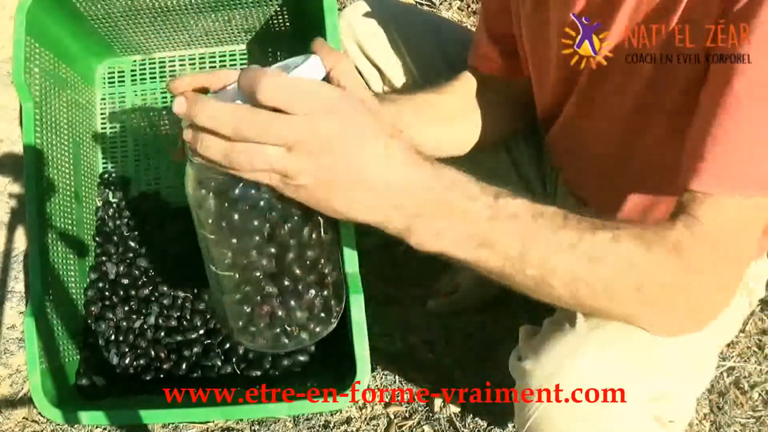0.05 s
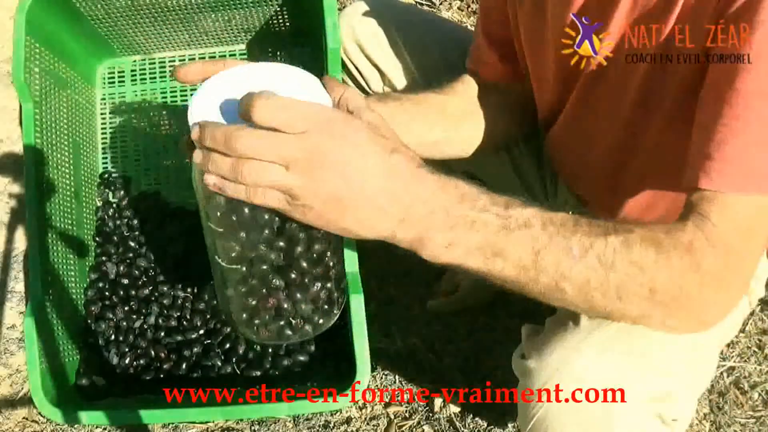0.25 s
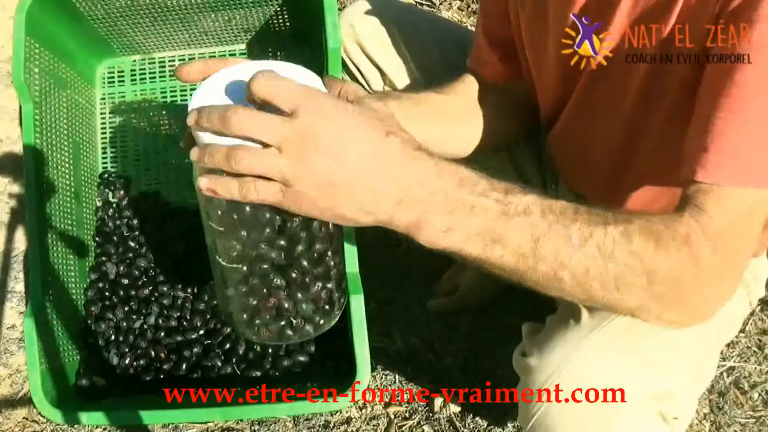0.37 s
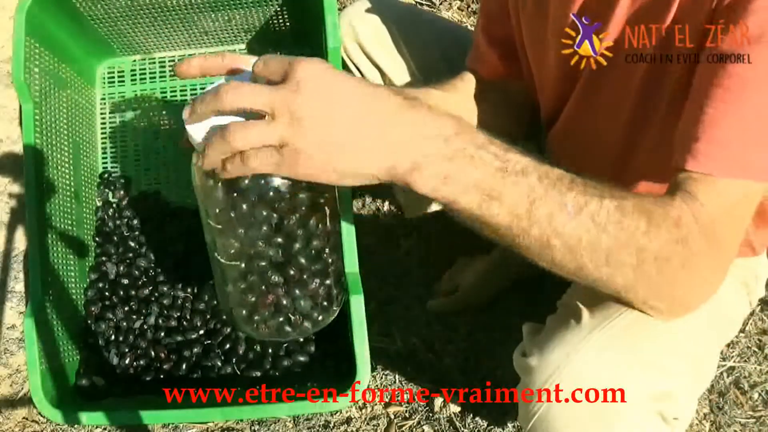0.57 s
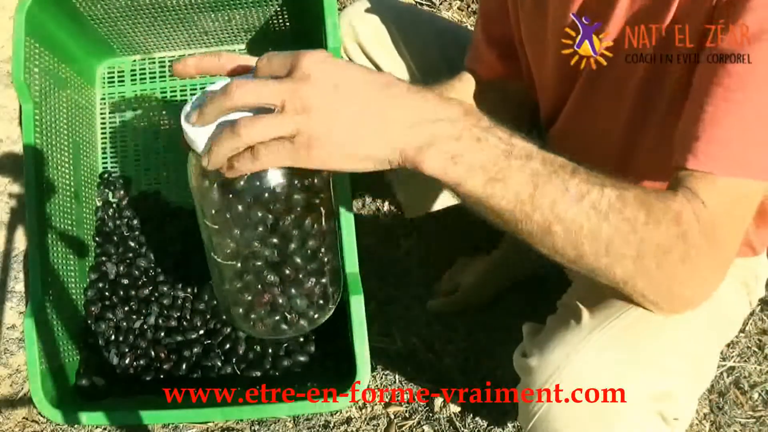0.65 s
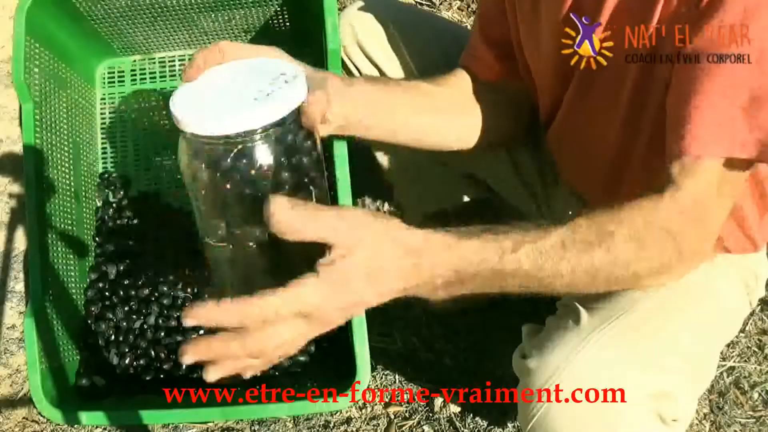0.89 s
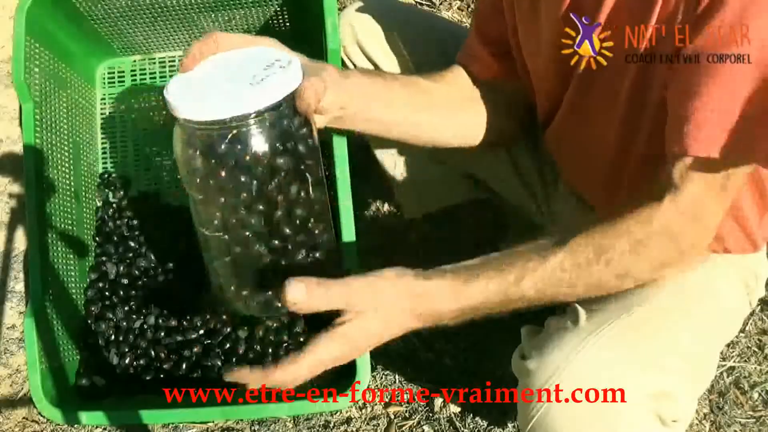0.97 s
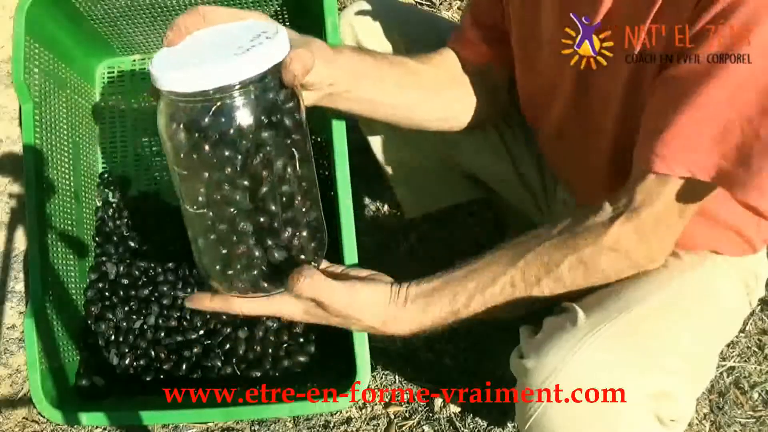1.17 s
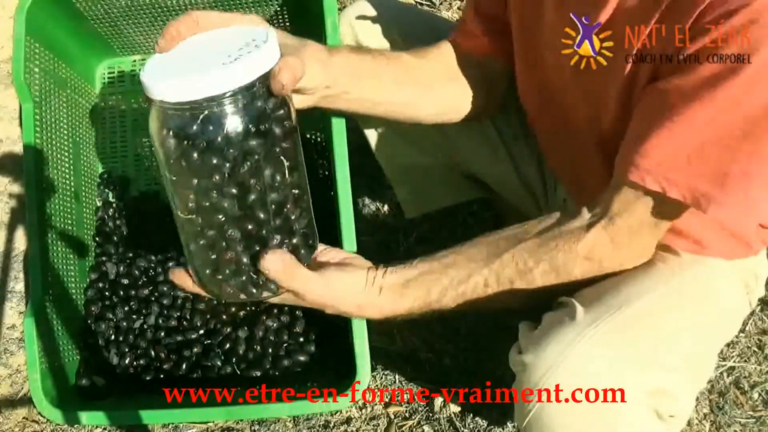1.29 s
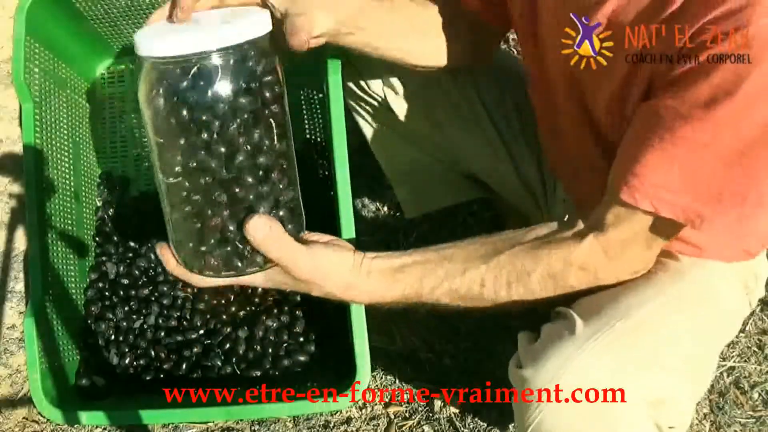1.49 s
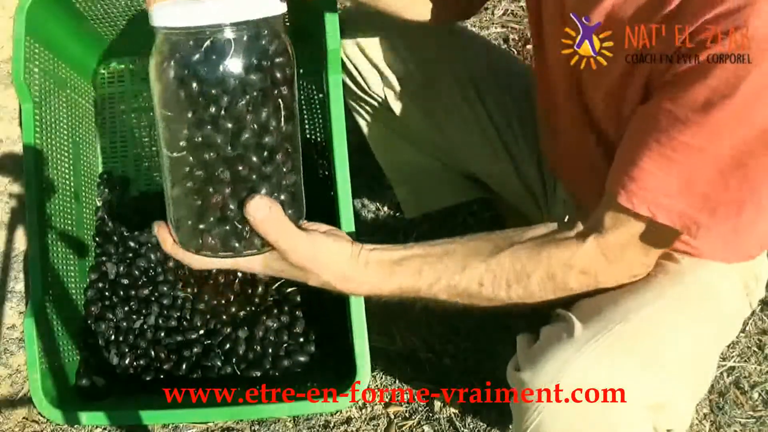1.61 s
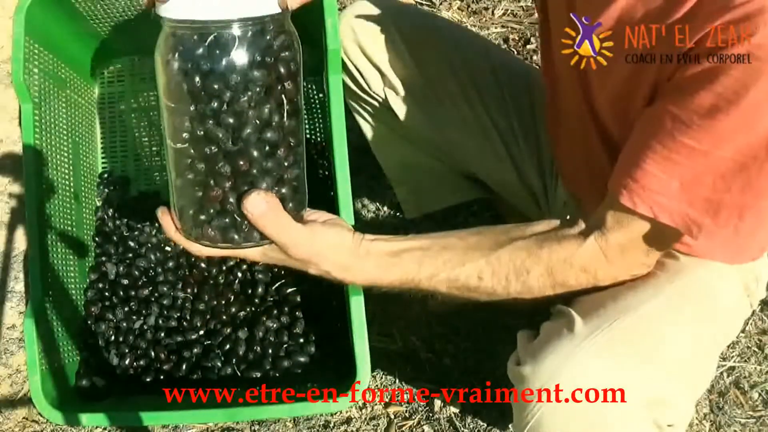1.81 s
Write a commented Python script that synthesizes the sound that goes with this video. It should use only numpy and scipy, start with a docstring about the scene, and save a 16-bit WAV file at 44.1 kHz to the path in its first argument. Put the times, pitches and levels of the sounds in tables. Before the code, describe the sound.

A metal lid clinks onto a glass jar, snaps over the thread with sharp clicks and scrapes as it turns. Then a hand slides softly over the glass with a few faint ticks, close by in quiet outdoor air.

```python
"""Outdoors, close by, a metal screw lid is put on a large glass jar full of berries.
The loose lid clinks on the rim and snaps over the thread as the hand presses it down,
then scrapes round and ticks tight. Each touch makes a sharp crack, rings the lid and
knocks the hollow jar. A hand slides down the glass with a soft hiss.
Faint outdoor air and a low rumble lie underneath."""
import sys
import numpy as np
from scipy import signal
from scipy.fft import rfft, irfft, next_fast_len
from scipy.io import wavfile
from scipy.ndimage import map_coordinates

SR = 44100
rng = np.random.default_rng(int(sys.argv[2]) if len(sys.argv) > 2 else 0)


def generate_wav(signal):
    """Clip the signal to [-1, 1] and save it as 16-bit WAV at the path in sys.argv[1]."""
    frames = np.transpose(np.atleast_2d(signal))
    scaled = np.clip(frames, -1, 1) * 32767
    pcm = np.round(scaled).astype(np.int16)
    wavfile.write(sys.argv[1], SR, pcm)


N = 81585
TIME_S = np.arange(N) / SR
HIT_TIME_S = np.arange(int(.3 * SR)) / SR  # the clock for one hit
LID_ATTACK_S, KNOCK_ATTACK_S = .0017, .0019


# Each time the lid hits the glass. The ring is favoured at centre_hz; ring_length scales its fade time.
# start_s, ring_db, centre_hz, falloff_db_per_octave, ring_length, crack_db, tilt_db_per_octave, knock_db
LID_HITS = [(.198, -39, 810, 15, 0.73, -48.5, 3, -42.5),
            (0.2403, -14.5, 1950, 6.5, 1.4, -18.5, -0.5, -34.5),
            (0.244, -10.5, 2100, 2.5, 0.96, -18, -0.5, -27),
            (0.2908, -12.5, 1090, 7.5, 0.94, -13.5, -0.5, -29),
            (0.361, -34.5, 1750, 22, 2.2, -66, -17, -59), (0.4093, -17.5, 3400, 17, 0.3, -16, 2, -24),
            (.4122, -17.5, 3280, 0, 0.41, -16.5, -1.5, -24.5), (0.424, -28, 3000, 5.5, 0.72, -30, -10, -33),
            (.471, -42, 1700, 8, 0.37, -45, -4, -57), (0.5991, -18.5, 1930, 3.5, 0.41, -12, -2.5, -23.5),
            (.604, -22, 1600, 0, 0.42, -14, -0.5, -22), (0.619, -35.5, 1980, 10, 1, -41, 17, -58),
            (.639, -32, 1600, 7, .6, -25, -4, -43), (0.6692, -16.5, 1890, 9, 0.38, -19.5, 0, -41),
            (0.6731, -21.5, 850, 3, 0.32, -18, -4.5, -29), (.692, -64, 900, 5, 0.58, -29, -3.5, -28.5),
            (0.7614, -27, 1670, 12, 0.093, -58, 0, -77), (0.865, -33, 4500, 7, 0.26, -44.5, 4, -35),
            (0.8708, -38, 850, 6, 0.39, -38.5, -4, -40), (.891, -31.5, 1700, 15.5, 0.29, -49, -7, -50),
            (.903, -40, 850, 3, 0.42, -44, -3.5, -44), (1.442, -45, 850, 13, .35, -61, -6, -50),
            (1.467, -48, 850, 12, 0.3, -54, -2.5, -41.5), (1.554, -54, 860, 1, 0.74, -51, 11, -38),
            (1.5637, -27.5, 4100, 19, 0.4, -33.5, -1.5, -57), (1.577, -55, 850, -2, 0.82, -41, 4.5, -37.5),
            (1.767, -47, 4500, 7.5, 0.44, -51, 10, -49.5), (1.784, -69.5, 850, 3, 0.64, -67, 3, -50),
            (1.835, -51, 3000, 9, 0.51, -58, -7, -69)]
def lid_clinks(hush_db=16, hush_s=.002):
    """Each hit hushes the ringing lid, rings it again, cracks and knocks the jar."""
    ringing, impacts = np.zeros(N), np.zeros(N)
    for start_s, ring_db, centre_hz, falloff, ring_length, crack_db, tilt, knock_db in LID_HITS:
        ringing *= amp(-hush_db * np.clip((TIME_S - start_s) / hush_s, 0, 1))
        pitch_hz, level_db, fade_s = lid_tones(start_s)
        level_db = level_db - falloff * abs(np.log2(pitch_hz / centre_hz))
        clink = ring(pitch_hz, level_db, fade_s * ring_length, LID_ATTACK_S)
        add(ringing, start_s, amp(ring_db) * clink)
        add(impacts, start_s, amp(crack_db) * crack(start_s, tilt))
        add(impacts, start_s, amp(knock_db) * jar_knock(start_s))
    return ringing + impacts


# The metal lid's own tones: loose_hz, tight_hz, loose_db, tight_db, fade_s
LID_TONES = [(905.7, 845, -6, 4, 0.125), (880.6, 970, -9.5, -8.5, 0.2), (1369, 1370, -16.5, -5.5, 0.12),
             (1470, 1710, -22.5, -2, 0.14), (1792, 1640, 3.5, -10, .075), (1890, 1890, -15.5, 1.5, 0.061),
             (2249, 2295, 2, -3.5, 0.089), (2695, 4500, -18, -10, 0.15), (2758, 3800, -15, -13, 0.1),
             (3400, 3330, -8, 3, 0.12), (4160, 4270, -9.5, -2, 0.084), (4910, 4900, -12, 4, 0.044),
             (6000, 6280, -16, 6, 0.066), (8460, 8400, -19, -24, 0.061)]
def lid_tones(time_s):
    """The lid's tones shift as it settles on the rim."""
    return tones_at(LID_TONES, time_s)


# How firmly the lid sits: time_s, tightness (0 loose, 1 tight)
LID_TIGHTNESS = [(.25, 0.08), (.295, .08), (.41, .35), (.5, 0.99)]
def loose_to_tight(loose, tight, time_s):
    """Slide from the loose value to the tight one as the lid is pressed down."""
    tightness = np.interp(time_s, *np.transpose(LID_TIGHTNESS))
    return loose + tightness * (tight - loose)


# How long a crack lasts, from bass to treble: pitch_hz, fade_s
CRACK_FADES = [(200, 0.062), (1500, 0.04), (4000, .03), (10000, 0.029)]
def crack(start_s, tilt):
    """Metal striking glass gives a sharp burst of noise."""
    burst = fade_by_band(rng.standard_normal(len(HIT_TIME_S)), CRACK_FADES)
    return colour_keeping_attack(burst, crack_colour(start_s, tilt))


# The crack's colour, its mix of low and high: pitch_hz, loose_db, tight_db
CRACK_COLOUR = [(102, -33, -18.5), (200, -10, -9), (400, -5, -5.5), (560, -21, -12.5), (720, -23, -6),
                (1080, -5, -8), (1450, -2, 2.5), (3200, -2, 0.5), (4200, 4, 0), (5670, -5.5, -2),
                (8400, -2.5, 2.5), (11000, -6, -6.5), (12500, -27, -10.5)]
def crack_colour(time_s, tilt=0):
    """A tight lid passes more bass into the jar; a positive tilt adds treble."""
    pitch_hz, loose_db, tight_db = np.transpose(CRACK_COLOUR)
    return np.c_[pitch_hz, loose_to_tight(loose_db, tight_db, time_s) + tilt * octaves(pitch_hz)]


# The hollow jar's own tones: loose_hz, tight_hz, loose_db, tight_db, fade_s
JAR_TONES = [(190, 160, -38, -11, 0.039), (286, 245.7, -11.5, -2.5, 0.066), (320.3, 341, -4.5, -4, 0.065),
             (347.4, 385, -0.5, -7.5, 0.097), (400, 520, -18.5, -14, 0.054)]
def jar_knock(start_s):
    """The hollow jar answers a hit with a short, low knock."""
    return ring(*tones_at(JAR_TONES, start_s), KNOCK_ATTACK_S)


# How loudly the thread scrapes: time_s, level_db
SCRAPE_LEVELS = [(.17, -68.5), (.33, -60), (.37, -49), (.4, -35), (.45, -63), (.49, -60), (.545, -46),
                 (.568, -68), (.582, -33.5), (.63, -52), (.66, -42.5), (.71, -45), (.745, -57), (.8, -68.5),
                 (1.42, -69), (1.53, -60.5), (1.6, -62), (1.69, -59.5), (1.73, -68), (1.8, -66.5),
                 (1.84, -62.5)]
# The colour of the scrape: pitch_hz, level_db
SCRAPE_SPECTRUM = [(100, -14), (300, 13), (600, -5.5), (1800, 3.5), (4000, -27.5), (8000, -8.5),
                   (11000, -7)]
def thread_scrape(tight_s=.5, ring_db=-1.5, ring_length=.55, tilt_db_per_octave=-1.5):
    """The lid grates along the thread; being pressed, it rings shorter and duller."""
    slips = tiny_slips()
    pitch_hz, level_db, fade_s = lid_tones(tight_s)
    level_db = level_db + tilt_db_per_octave * octaves(pitch_hz)
    pressed_lid = ring(pitch_hz, level_db, fade_s * ring_length, LID_ATTACK_S)
    ringing = unit(signal.fftconvolve(slips, pressed_lid)[:N])  # every slip rings the lid
    grating = coloured(slips, SCRAPE_SPECTRUM)
    return amp(over_time(SCRAPE_LEVELS)) * unit(grating + amp(ring_db) * ringing)


# The drag that builds up to each snap: snap_s, peak_db, rise_s
THREAD_DRAGS = [(0.2416, -33, 0.0021), (0.4084, -25, 0.0034), (0.5978, -22.5, 0.0058),
                (0.6675, -37.5, 0.0049)]
def thread_drag(tight_s=.5):
    """The lid drags harder just before it snaps over the thread."""
    swell = np.zeros(N)
    for snap_s, peak_db, rise_s in THREAD_DRAGS:
        swell += amp(peak_db) * np.exp(-abs(TIME_S - snap_s) / rise_s) * (TIME_S < snap_s)
    return swell * coloured(tiny_slips(), crack_colour(tight_s))


def tiny_slips(slips_per_s=2500, spread_db=6.5):
    """Metal moves over glass in many tiny jerks of random size."""
    happens = rng.random(N) < slips_per_s / SR
    direction = rng.choice([-1, 1], N)
    size = amp(spread_db * np.clip(rng.standard_normal(N), -2, 2))
    return happens * direction * size


# How loudly skin rubs on lid and glass: time_s, level_db
HAND_LEVELS = [(0, -67.5), (.08, -57), (.13, -60), (.44, -65), (.53, -54.5), (.66, -65), (.78, -62),
               (.88, -52.5), (.95, -55), (1.0, -55), (1.08, -59.5), (1.16, -51), (1.27, -59), (1.38, -53.5),
               (1.425, -62.5), (1.53, -55), (1.635, -54), (1.648, -49), (1.71, -59.5), (1.85, -60.5)]
# The colour of the rubbing: pitch_hz, level_db
HAND_COLOUR = [(590, -45), (1000, -10), (1750, -8), (1920, -6), (2190, -6), (2670, -4), (4240, -4),
               (8310, -1.5), (11000, -11.5), (14300, -57), (22000, -120)]
def hand_rub(gain_db=-.5, flutter_db=1.77, flutters_per_s=55):
    """Skin sliding on the jar makes a soft, uneven hiss."""
    random_points = rng.standard_normal(N // 100)
    flutter = map_coordinates(random_points, [TIME_S * flutters_per_s], mode="wrap")  # joined smoothly
    level_db = gain_db + over_time(HAND_LEVELS) + flutter_db * flutter
    return pan(amp(level_db) * wide_noise(HAND_COLOUR), left_db=-.34)


# How long the nearby echo lasts: pitch_hz, fade_s
ECHO_FADES = [(200, .16), (2000, 0.42), (10000, 0.16)]
# The colour of that echo: pitch_hz, level_db
ECHO_COLOUR = [(200, -4), (2000, -7), (4000, -2.5), (10000, 4)]
def nearby_echo(sound, level_db=-16):
    """Sound scatters back from a crate, the person's body and the ground."""
    tails = fade_by_band(wide_noise(ECHO_COLOUR)[:, :len(HIT_TIME_S)], ECHO_FADES)
    tails /= np.linalg.norm(tails[0])
    return amp(level_db) * signal.fftconvolve(sound[None], tails, axes=1)[:, :N]


# The colour of the outdoor air: pitch_hz, level_db
AIR_COLOUR = [(20, 1), (100, -6.5), (180, -0.5), (290, 0), (450, -13.5), (650, -13.5), (850, -16.5),
              (1100, -22), (3000, -21.5), (8000, -36.5)]
# How loud the low rumble is: time_s, level_db
RUMBLE_LEVELS = [(0, -71), (.45, -63), (.92, -68), (1.02, -54.5), (1.12, -65), (1.45, -65), (1.6, -57.5),
                 (1.7, -60), (1.85, -67)]
# The colour of the rumble: pitch_hz, level_db
RUMBLE_SPECTRUM = [(15, -6), (40, 2.5), (70, 2.5), (120, -16), (250, -37), (1000, -82)]
def outdoor_air(air_db=-57.5):
    """Faint, steady air and a low rumble that comes and goes."""
    air = amp(air_db) * wide_noise(AIR_COLOUR)
    rumble = amp(over_time(RUMBLE_LEVELS)) * wide_noise(RUMBLE_SPECTRUM)
    return air + rumble


# How wide the jar sounds (higher is wider): pitch_hz, width_db
JAR_WIDTH = [(200, -22.5), (900, -20.5), (2000, -16.5), (4000, -9), (10000, -7)]
def spread_jar(sound, delay_s=.0003):
    """Left and right move together in the bass and drift out of step in the treble."""
    side = filtered(sound, lambda hz: 1j * amp(at_pitch(JAR_WIDTH, hz)) * np.sin(2 * np.pi * hz * delay_s))
    return pan(np.array([sound + side, sound - side]), left_db=.5)


# How wide the hand, echo and air sound: pitch_hz, width_db
HISS_WIDTH = [(40, -23), (300, -9), (1500, 2), (5000, -9.5), (10000, -8)]
def wide_noise(colour):
    """Stereo noise: both ears share the middle and get the side with opposite signs."""
    middle, side = coloured(rng.standard_normal((2, N)), colour)
    side = filtered(side, lambda hz: amp(at_pitch(HISS_WIDTH, hz)))
    return unit(np.array([middle + side, middle - side]))


def tones_at(table, time_s):
    """Pitches, levels and fade times for how tight the lid is at this moment."""
    loose_hz, tight_hz, loose_db, tight_db, fade_s = np.transpose(table)
    return loose_to_tight(loose_hz, tight_hz, time_s), loose_to_tight(loose_db, tight_db, time_s), fade_s


def ring(pitch_hz, level_db, fade_s, attack_s, detune=.002, scatter_db=1, waver_rad=.02):
    """Struck tones that fall 60 dB in fade_s, a little different at each hit."""
    pitch_luck, level_luck = rng.standard_normal((2, len(pitch_hz), 1))
    # The lid shifts on the rim, so the tones waver, the high ones most.
    wander = rng.standard_normal((len(pitch_hz), len(HIT_TIME_S))).cumsum(1)
    waver = waver_rad * np.sqrt(pitch_hz[:, None] / pitch_hz.max()) * wander
    phase = 2 * np.pi * pitch_hz[:, None] * (1 + detune * pitch_luck) * HIT_TIME_S + waver
    loudness = amp(level_db[:, None] + scatter_db * level_luck - 60 * HIT_TIME_S / fade_s[:, None])
    return (loudness * np.sin(phase)).sum(0) * (1 - np.exp(-HIT_TIME_S / attack_s))


def fade_by_band(sound, fades):
    """Split a sound from low to high; each band falls 60 dB in its own fade_s."""
    pitch_hz, fade_times = np.transpose(fades)
    faded = 0
    for weights, fade_s in zip(np.eye(len(pitch_hz)), fade_times):
        band = filtered(sound, lambda hz: at_pitch(np.c_[pitch_hz, weights], hz))
        faded += band * amp(-60 * HIT_TIME_S / fade_s)
    return faded


def colour_keeping_attack(sound, colour):
    """Colour a sound without smearing its sharp start."""
    size = next_fast_len(2 * len(sound))
    gain = unit(amp(at_pitch(colour, np.fft.rfftfreq(size, 1 / SR))))
    cepstrum = irfft(np.log(gain), size)
    # Move the filter's early half to after the hit (minimum phase).
    cepstrum[1:size // 2] *= 2
    cepstrum[size // 2 + 1:] = 0
    return irfft(rfft(sound, size) * np.exp(rfft(cepstrum)), size)[:len(sound)]


def coloured(sound, colour):
    """Give a sound its mix of low and high, at an average level of 1."""
    return unit(filtered(sound, lambda hz: amp(at_pitch(colour, hz))))


def filtered(sound, gain):
    """Turn each pitch up or down by gain(hz)."""
    length = sound.shape[-1]
    size = next_fast_len(2 * length)
    return irfft(rfft(sound, size) * gain(np.fft.rfftfreq(size, 1 / SR)), size)[..., :length]


def at_pitch(table, hz):
    """Read between a table's rows on a musical (log) pitch scale."""
    pitch_hz, values = np.transpose(table)
    return np.interp(np.log(hz + 1), np.log(pitch_hz + 1), values)


def over_time(table):
    """Read between a table's rows at every sample."""
    return np.interp(TIME_S, *np.transpose(table))


def octaves(hz):
    """Octaves above the middle of the lid's range."""
    return np.log2(np.maximum(hz, 400) / 2000)


def amp(db):
    """Turn decibels into a multiplier."""
    return 10 ** (np.asarray(db) / 20)


def unit(sound):
    """Scale to an average (rms) level of 1."""
    return sound / np.sqrt(np.mean(sound ** 2) + 1e-20)


def pan(stereo, left_db):
    """Lean a sound to the left, or to the right if negative."""
    return stereo * amp([[left_db], [-left_db]])


def add(track, start_s, sound):
    """Mix a sound in at start_s."""
    part = track[round(start_s * SR):][:len(sound)]
    part += sound[:len(part)]


def scene():
    """The jar gives off little bass; its echo, the hand and the air lie around it."""
    bass_cut = signal.butter(3, 147, "high", fs=SR, output="sos")  # below 147 Hz
    jar = signal.sosfilt(bass_cut, lid_clinks() + thread_scrape() + thread_drag())
    return spread_jar(jar) + nearby_echo(jar) + hand_rub() + outdoor_air()


def record(dry):
    """Round off the loudest peaks, turn down the top treble and cut everything above it."""
    ceiling, treble_hz, treble_db, cut_hz = .8, 11250, -27, 15300
    rounded = dry / (1 + abs(dry / ceiling) ** 8) ** (1 / 8)

    def treble_gain(hz):
        steep_drop = 1 / np.sqrt(1 + (hz / treble_hz) ** 120)
        return np.maximum(steep_drop, amp(treble_db)) * (hz < cut_hz)
    return filtered(rounded, treble_gain)


dry = scene()
out = record(dry)
generate_wav(out)
```